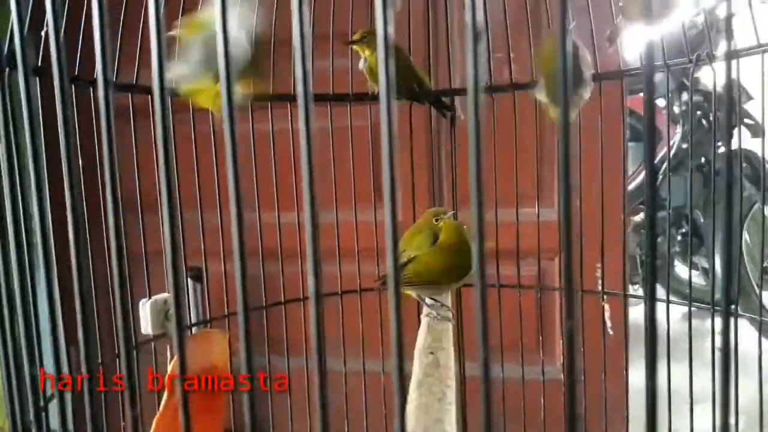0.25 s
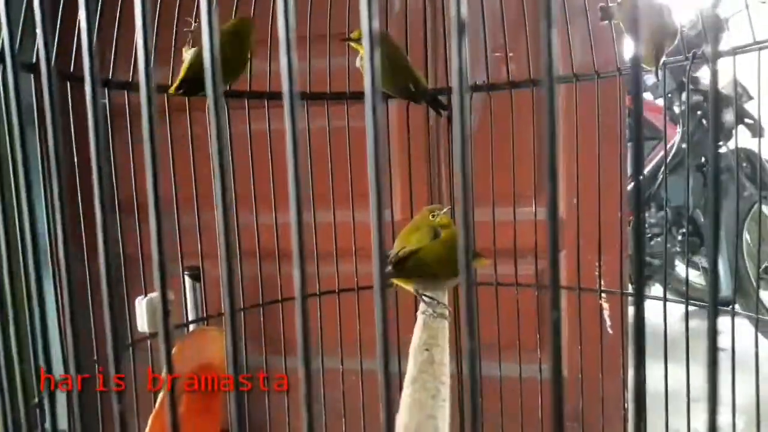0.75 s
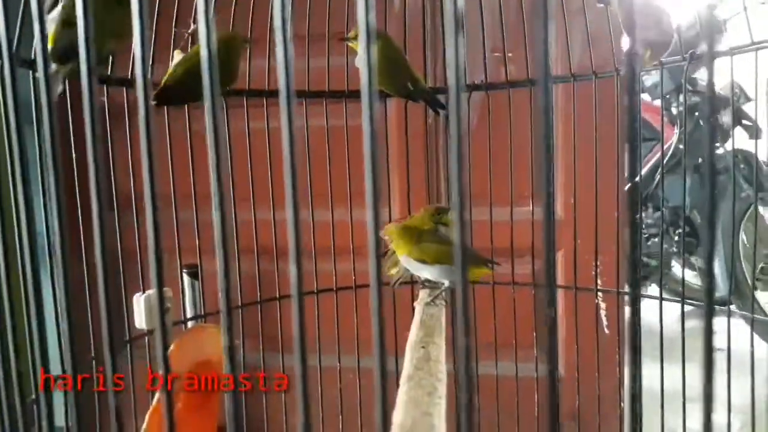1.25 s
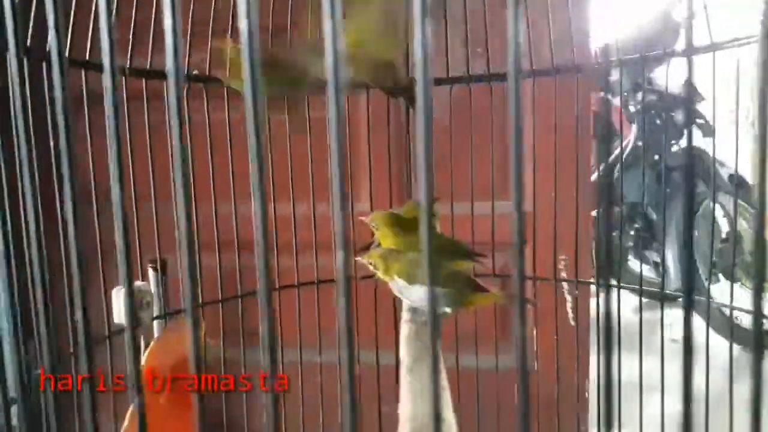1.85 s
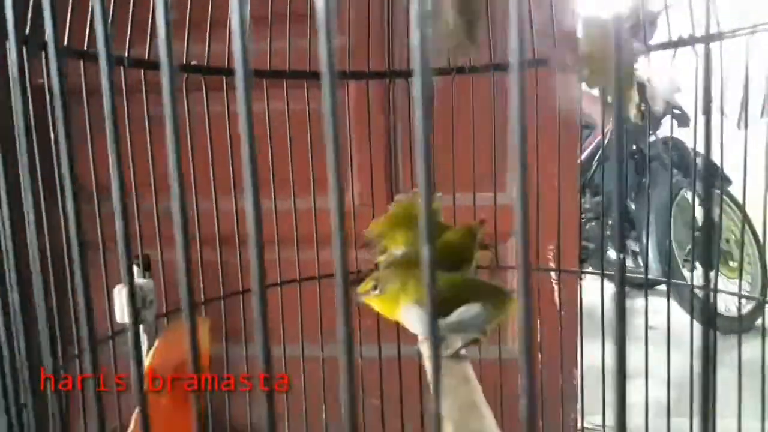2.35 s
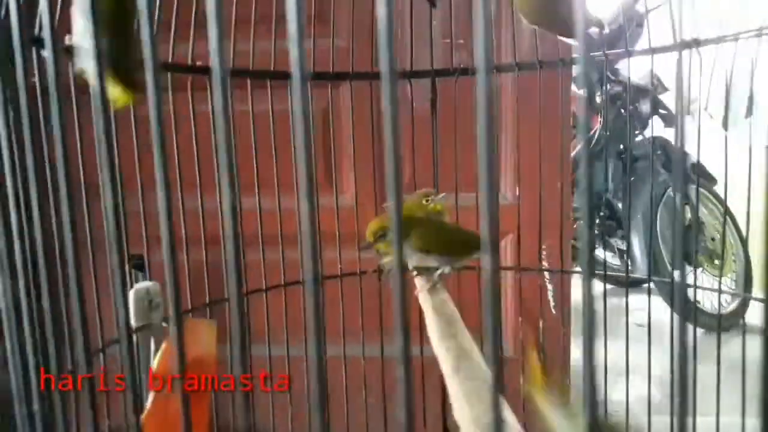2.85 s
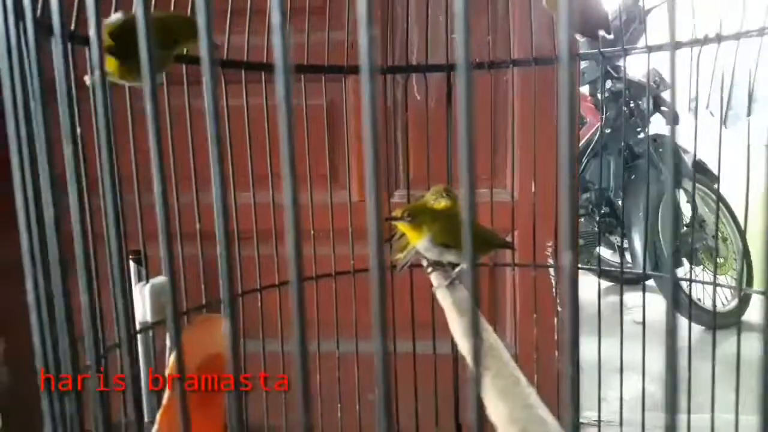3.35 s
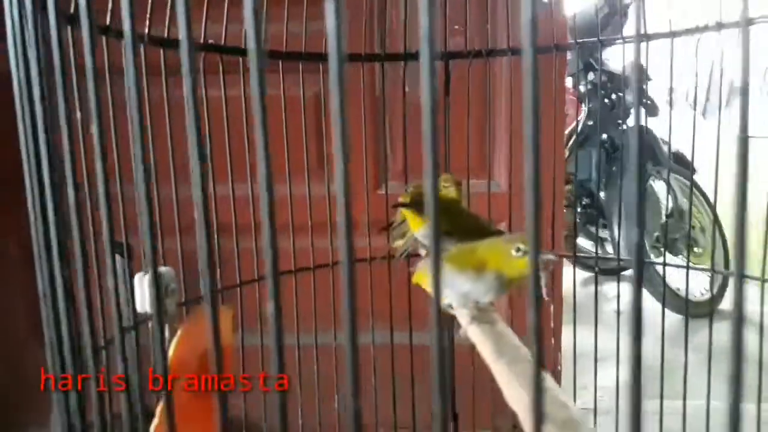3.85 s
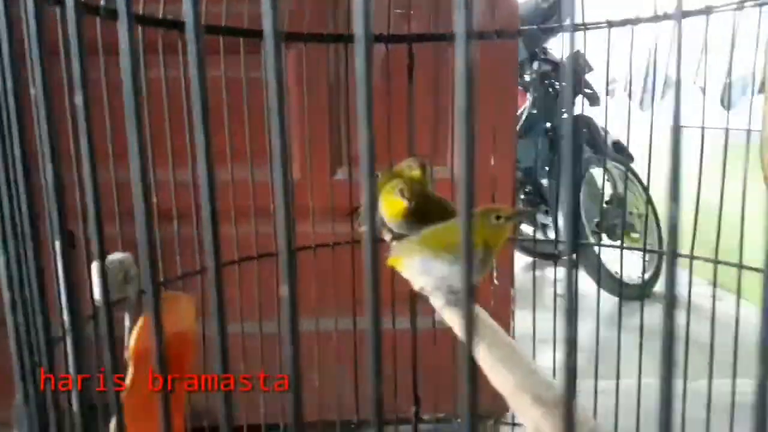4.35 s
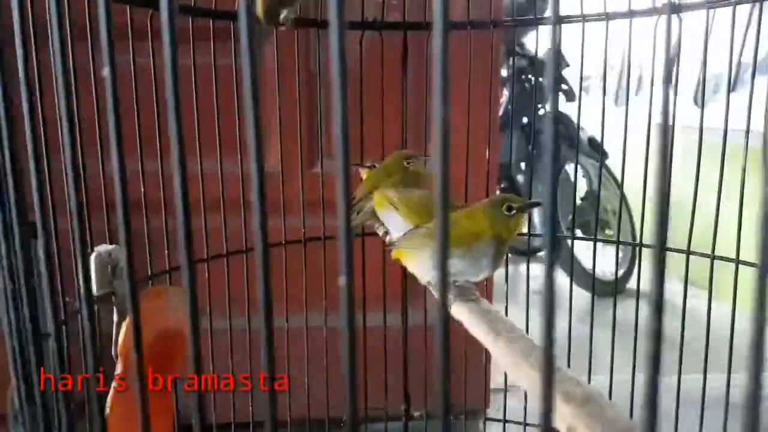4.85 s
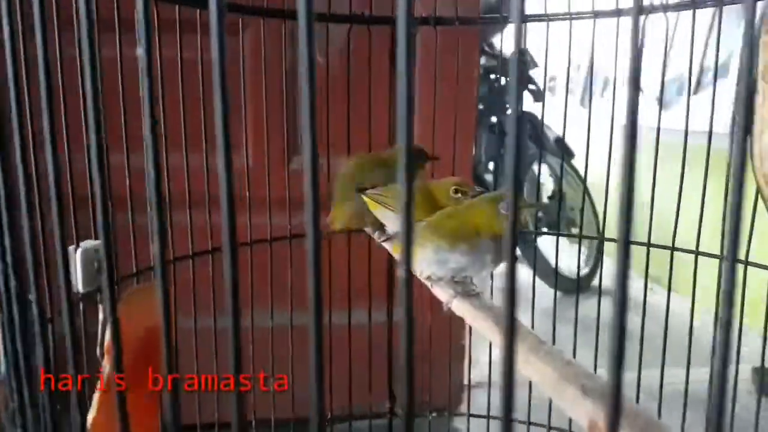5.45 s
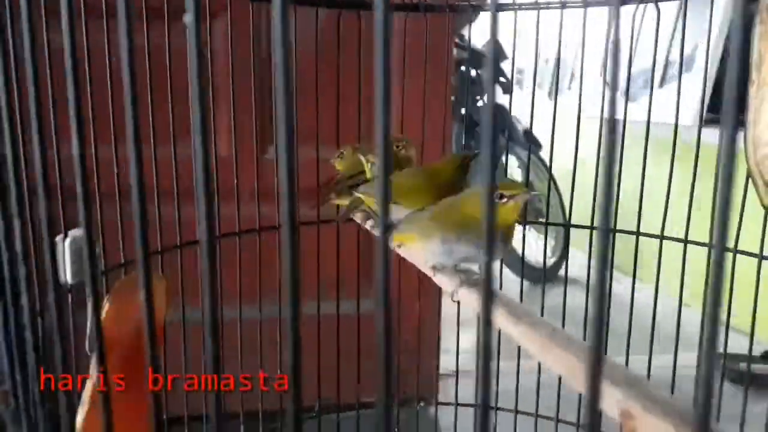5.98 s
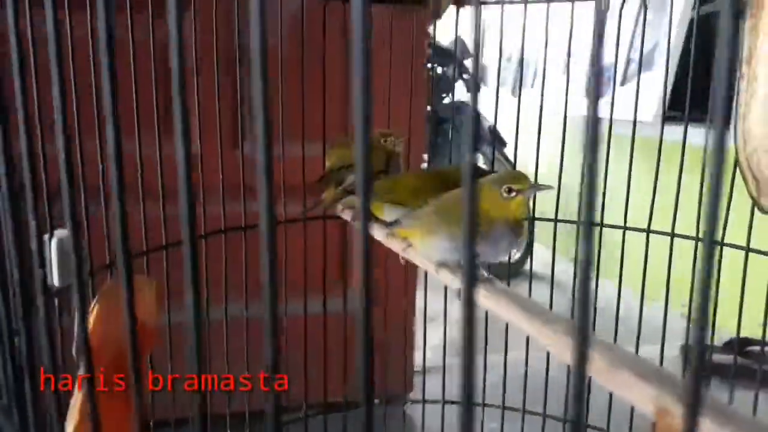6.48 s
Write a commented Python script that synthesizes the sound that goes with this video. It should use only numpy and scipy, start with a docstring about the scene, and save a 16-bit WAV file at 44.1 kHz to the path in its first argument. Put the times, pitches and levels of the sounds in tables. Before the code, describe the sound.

Small songbirds chirp very close in a wire cage on a porch, a fast run of high falling whistles, each starting with a quick trill. One bird adds a few harsh scolds. Wings flutter briefly, feet scrape perches and wires ping thinly. Past the middle the near chirps pause, leaving echoing answers on the right, then they resume. A soft yard murmur and a fading far engine lie behind.

```python
"""A porch, where small songbirds chirp in a wire cage, so near that the loudest overload the microphone.
Each chirp is a falling whistle that opens with a fast trill; one bird scolds in a period-doubled voice.
Wings push air and rustle, feet scrape perches, touched wires ping. More birds answer from the right,
mostly as echo. Behind them the yard murmurs, a far engine fades and lower bird voices pip and quaver."""
import sys
import numpy as np
from scipy import signal
from scipy.fft import rfft, irfft, next_fast_len
from scipy.io import wavfile
from scipy.ndimage import map_coordinates

SR = 44100
rng = np.random.default_rng(int(sys.argv[2]) if len(sys.argv) > 2 else 0)


def bounce(signal):
    """Save signal as a 16-bit WAV file at the path given by the first command-line argument."""
    frames = np.transpose(np.atleast_2d(signal))
    limited = np.clip(frames, -1, 1)
    pcm = np.round(limited * 32767).astype(np.int16)
    wavfile.write(sys.argv[1], SR, pcm)


N = 296352


def amp(db):
    """Decibels to gain."""
    return 10 ** (np.asarray(db) / 20)


def unit(x):
    """Scale to rms 1."""
    return x / np.sqrt(np.mean(x ** 2) + 1e-20)


def along(points, hz):
    """Interpolate (Hz, value) points on a log axis."""
    knots_hz, values = np.transpose(points)
    return np.interp(np.log(hz + 1), np.log(knots_hz + 1), values)


def across(values, size):
    """Join evenly spaced values over size samples."""
    return np.interp(np.linspace(0, 1, size), np.linspace(0, 1, len(values)), values)


def wobble(rate_hz, size):
    """Smooth random curve, rate_hz knots a second."""
    knots = rng.standard_normal(int(size * rate_hz / SR) + 4)
    return map_coordinates(knots, [np.arange(size) * rate_hz / SR])


def phase_of(hz):
    """Running phase in radians."""
    return 2 * np.pi * np.cumsum(hz) / SR


def filtered(x, response):
    """Apply a gain given as a function of Hz."""
    size = x.shape[-1]
    padded = next_fast_len(size + 8192)
    return irfft(rfft(x, padded) * response(np.fft.rfftfreq(padded, 1 / SR)), padded)[..., :size]


def noise(spectrum):
    """Noise of rms 1, shaped by (Hz, dB) points."""
    return unit(filtered(rng.standard_normal(N), lambda hz: amp(along(spectrum, hz))))


def add(track, start_s, sound):
    """Mix a sound into a track."""
    part = track[..., max(0, round(start_s * SR)):][..., :sound.shape[-1]]
    part += sound[..., :part.shape[-1]]


# Door, floor and roof echoes. Each row: delay in seconds, gain in dB.
WALL_ECHOES = [(.0019, -25), (.0043, -14.5), (.0078, -13), (.0128, -16.5), (.021, -18), (0.032, -17)]

def walls(x):
    """Near echoes beat against the gliding pitch."""
    return x + sum(amp(db) * np.pad(x, (int(delay_s * SR), 0))[:N] for delay_s, db in WALL_ECHOES)


# Porch decay. Each row: frequency in Hz, T60 in seconds.
PORCH_T60 = [(500, 0.86), (4000, 0.42), (9000, 0.5), (15000, 0.048)]

def porch(x):
    """Diffuse stereo echo of a mono sound; treble dies first."""
    hz, t, spectra = signal.stft(rng.standard_normal((2, SR * 3 // 4)), SR, nperseg=256)
    t60_s = along(PORCH_T60, hz)[:, None]
    tail = signal.istft(spectra * amp(-60 * t / t60_s), SR, nperseg=256)[1]
    tail /= np.linalg.norm(tail, axis=1, keepdims=True)
    return signal.fftconvolve(x[None], np.pad(tail, ((0, 0), (200, 0))), axes=1)[:, :N]


# Swell, hold and release: levels in dB, evenly spaced over a note.
NOTE_ARCH_DB = [-4.5, 1, 4.5, 4, 2.5, 2, 0.7, -3.5]
# How loud each pitch of the whistle sounds at the microphone. Each row: pitch in Hz, gain in dB.
PITCH_GAIN = [(3300, -4), (3700, 3), (4000, -1.3), (4300, -0.2), (4700, 0.4), (5100, 7), (5500, 0.5),
              (6000, -2)]

def contour(length_s, rise_s, top_hz, end_hz, knee, db, fade_db, count=25):
    """Pitch and level of a note: it scoops up, lingers, falls past the knee and flattens out."""
    t = np.linspace(0, length_s, count)
    progress = np.maximum(t - rise_s, 0) / (length_s - rise_s)
    height = (1 - progress ** 2) / (1 + (progress / knee) ** 2)
    scoop_hz = 12000 * np.maximum(rise_s - t, 0)
    droop_hz = 85 * progress ** 10
    kinks_hz = 28 * rng.standard_normal(count)
    hz = end_hz + (top_hz - end_hz) * height - scoop_hz - droop_hz + kinks_hz
    shake_db = 1.9 * rng.standard_normal(count)
    shape_db = across(NOTE_ARCH_DB, count) + along(PITCH_GAIN, hz) - fade_db * t / length_s + shake_db
    return hz, db + 20 * np.log10(unit(amp(shape_db)))


# Overtone colour. Each row: frequency in Hz, gain in dB.
BEAK_GAIN = [(4500, 0), (6200, -2.5), (7200, 5.5), (8000, 0.5), (8700, 11), (9300, 9), (10200, 4.5),
             (11000, -1.5), (12000, 2.5), (13400, 7), (15500, -3)]

def syrinx(length_s, pitches_hz, levels_db, depth_hz, overtones, trill_hz, trill_s, rough_hz, rasp=0):
    """One note: the pitch hooks up, trills, follows its glide and drops as the air stops."""
    size = int(length_s * SR)
    t = np.arange(size) / SR
    trill = np.sin(phase_of(trill_hz * (1 + 0.12 * wobble(36.3, size))))
    opening = np.exp(-(t / trill_s) ** 2)
    hooks = 1 - 0.26 * np.exp(-t / 0.0022) - 0.082 * np.exp((t - length_s) / 0.0033)
    waver_hz = 50 * wobble(110, size) + rough_hz * wobble(600, size)
    hz = across(pitches_hz, size) * hooks + depth_hz * (0.79 * opening + 0.085) * trill + waver_hz
    phase = phase_of(hz)
    level_db = across(levels_db, size)
    gate = lambda rise_s: np.clip(t / rise_s, 0, 1) * np.clip((length_s - t) / 0.0049, 0, 1)
    tone = amp(level_db) * gate(0.005) * np.sin(phase)
    # Overtones spit out as the membranes snap into motion, then fade less than the whistle.
    upper_db = (level_db + np.mean(levels_db)) / 2 + 4 * (opening - 1) + 7 * np.exp(-t / 0.006)
    for multiple, db in overtones:
        flicker_db = 3.5 * wobble(110, size)
        gain = amp(upper_db + db + along(BEAK_GAIN, multiple * hz) + flicker_db)
        jitter_rad = rasp * (0.55 * opening + 0.3) * wobble(1500, size)
        tone += gain * gate(0.003) * np.sin(multiple * phase + jitter_rad)
    tremolo_db = across([1.8, 0], size) * opening * trill
    return np.sqrt(2) * tone * amp(tremolo_db)


# Near whistles. Each row: start, length and rise in seconds, top and end pitch in Hz,
# knee as a share of the fall, relative level in dB, fade in dB, trill depth in Hz.
CHIRP_NOTES = [(0, .115, 0, 5210, 3390, 0.51, -5.5, 7.5, 217),
               (.171, .14, 0, 5824, 3654, 0.51, -6, 4.5, 300),
               (0.56, .077, 0.00047, 4490, 3530, 0.93, -11, -0.5, 120),
               (.751, 0.09, 0.0035, 4110, 3530, 1.18, -10, 0.5, 120),
               (0.891, 0.14, 0.022, 5002, 3562, 0.52, -4, 5, 268),
               (1.095, 0.14, 0.00038, 5354, 3715, .48, -5.5, 1, 250),
               (1.295, 0.077, 0.015, 5520, 4760, 1.12, -4, -7, 230),
               (1.405, 0.071, 0.0022, 4430, 3570, .84, -9.5, -1, 120),
               (1.757, 0.13, 0.026, 5270, 4140, 0.49, -5.5, -1.5, 146),
               (1.868, 0.11, 0.02, 4450, 3590, 0.96, -10, -4.5, 120),
               (2.087, 0.092, 0.011, 5700, 4190, 0.44, -5, 1.5, 252),
               (2.341, 0.095, 0, 4960, 3424, 0.55, -12.5, 1.5, 120),
               (2.55, .18, 0.021, 5436, 3680, 0.4, -6.5, 5, 300),
               (2.818, .11, 0.0019, 4950, 3574, 0.67, -8.5, 6.5, 199),
               (3.05, 0.089, 0.0011, 4646, 3465, 0.62, -13.5, 17, 120),
               (3.171, 0.072, 0.0043, 4370, 3340, 0.53, -16.5, 8, 120),
               (3.307, .15, .035, 5415, 4210, .32, -5.5, 7.5, 191),
               (3.505, 0.11, 0, 5140, 3324, 0.48, -8.5, 6.5, 248),
               (3.681, .145, 0.0023, 5763, 3698, 0.43, -7, -0.5, 333),
               (5.411, 0.16, 0.0034, 5634, 3780, .33, -8, -1.5, 120),
               (5.622, .14, 0.027, 5234, 3610, 0.75, -4, 2, 115),
               (5.888, 0.079, 0, 4620, 3554, 0.51, -12, 3, 120),
               (6.074, 0.13, 0, 5220, 4580, 0.2, -5.5, -4, 418),
               (6.185, .11, 0, 4080, 3696, 0.93, -9, 5, 100),
               (6.359, 0.083, 0.016, 5575, 4194, 0.49, -4, 1, 260),
               (6.609, .079, 0.0026, 4380, 3565, 0.93, -13, -0.5, 120)]
# Brief arched notes. Each row: start in seconds, relative level in dB.
TICK_NOTES = [(2.474, -16), (5.997, -16)]
# Whistle overtones. Each row: multiple of the pitch, gain in dB.
WHISTLE_OVERTONES = [(2, -42.5), (3, -69)]

def near_birds():
    """Loud clear whistles, close on the left."""
    song = np.zeros(N)
    for start_s, length_s, *shape, depth_hz in CHIRP_NOTES:
        add(song, start_s, syrinx(length_s, *contour(length_s, *shape), depth_hz, WHISTLE_OVERTONES,
                                  trill_hz=135, trill_s=0.048, rough_hz=42, rasp=0.7))
    for start_s, db in TICK_NOTES:
        add(song, start_s, syrinx(0.018, [3810, 3880, 3350], [db], 120, WHISTLE_OVERTONES,
                                  trill_hz=99, trill_s=0.061, rough_hz=18))
    song *= amp(-1.5)
    return walls(song) * amp([[0], [-34]]) + porch(song) * amp([[-14], [-31]])


# Short flights. Each row: start and length in seconds, relative puff and rustle levels in dB.
WING_FLIGHTS = [(0, 0.085, -44, -65), (0.429, 0.16, -41.5, -67), (1.797, 0.23, -74, -40),
                (2.541, 0.25, -63, -40), (3.517, 0.17, -69, -39.5), (4.435, 0.21, -63, -39),
                (5.482, 0.18, -66, -40), (5.672, 0.14, -45, -46)]

def wings(beat_hz=24):
    """Each wing beat pushes a puff of air and rustles the feathers."""
    air, feathers = np.zeros(N), np.zeros(N)
    for start_s, length_s, puff_db, rustle_db in WING_FLIGHTS:
        size = int(length_s * SR)
        phase = phase_of(beat_hz * (1 + 0.11 * wobble(8, size)))
        beats = np.sin(phase / 2) ** 4 * signal.windows.tukey(size)
        add(air, start_s, amp(puff_db) * beats)
        add(feathers, start_s, amp(rustle_db) * beats)
    puffs = air * noise([(20, 3), (60, 16), (130, 3), (400, -21), (2000, -79)])
    rustle = feathers * noise([(100, -39), (500, -16), (1800, 14), (6000, -11.5), (15000, -9)])
    return puffs * amp([[1], [7]]) + rustle


def shuffling():
    """Feet and feathers brush the perches in short uneven scrapes."""
    friction = noise([(400, -38), (1100, -15), (1700, -2), (2300, -8.5), (3200, -21), (9000, -42)])
    bursts = unit(amp(5 * wobble(28, N) + 2 * wobble(4, N)))
    scrapes = amp(-48) * friction * bursts
    return scrapes + amp(-6) * porch(scrapes)


# Murmur spectrum. Each row: frequency in Hz, relative density in dB.
YARD_SPECTRUM = [(15, -37), (25, -16.5), (183, -1), (340, -4.5), (631, -9.5), (1170, -6.5), (1620, -15),
                 (2060, -9.5), (2920, -11.5), (3720, -2.5), (4500, -1), (5140, -6), (5880, -17.5),
                 (13200, -31), (15500, -34)]
# Stereo likeness. Each row: frequency in Hz, left-right correlation.
YARD_CORRELATION = [(60, 0.059), (150, 0.6), (380, 0.57), (950, 0.87), (2380, 1), (5980, 0.02), (15000, 1)]
# Stereo balance. Each row: frequency in Hz, left minus right in dB.
YARD_BALANCE = [(30, -27), (70, -12.5), (150, -2), (600, -3), (1400, 0), (4000, -3.5), (12000, 0.5)]
# Level of the 150-1200 Hz band. Each row: time in seconds, level in dB.
YARD_BODY_DB = [(0, -41), (.5, -46), (1.5, -44), (3, -44), (4.5, -44.5), (5.6, -43.5), (6.72, -43)]

def yard():
    """Steady outdoor murmur, stronger on the right in the bass."""
    def mid_side_gain(hz):
        angle = np.arccos(np.clip(along(YARD_CORRELATION, hz), 0, 1)) / 2
        return amp(along(YARD_SPECTRUM, hz)) * [np.cos(angle), np.sin(angle)]
    mid, side = filtered(rng.standard_normal((2, N)), mid_side_gain)
    pair = np.array([mid + side, mid - side])
    pair = filtered(pair, lambda hz: amp(along(YARD_BALANCE, hz) * np.array([[0.5], [-0.5]])))
    body = filtered(pair.mean(0), lambda hz: (hz > 150) & (hz < 1200))
    level_db = np.interp(np.arange(N) / SR, *np.transpose(YARD_BODY_DB))
    return pair / body.std() * amp(level_db + 0.45 * wobble(9, N))


# Engine hum. Each row: time in seconds, strongest partial in Hz, relative level in dB.
ENGINE_RUN = [(0, 125.4, -61), (.3, 121, -44), (.55, 109.9, -49), (.9, 110.7, -57.5), (1.6, 109.8, -50),
              (2.6, 112, -53), (3.199, 108, -60.5), (6.72, 108, -78)]

def engine():
    """A far engine hums, slows a little and fades."""
    times_s, hz, db = np.transpose(ENGINE_RUN)
    t = np.arange(N) / SR
    phase = phase_of(np.interp(t, times_s, hz) * (1 + 0.019 * wobble(8.2, N)))
    hum = sum(amp(partial_db + 1.8 * wobble(13, N)) * np.sin(multiple * phase)
              for multiple, partial_db in [(0.5, -6), (1, 1), (1.5, -2)])
    return hum * amp(np.interp(t, times_s, db)) * amp([[-2], [1]])


def neighbouring_birds(count=70):
    """Faint scattered peeps from other yards, blurred by echo."""
    peeps = np.zeros(N)
    for when, pitch, glide, span, strength in rng.random((count, 5)):
        size = int((0.02 + 0.074 * span) * SR)
        hz = 1100 * 2.3 ** pitch * across([1, 0.92 + 0.14 * glide], size)
        add(peeps, when * N / SR, amp(-50 + 12 * strength) * np.hanning(size) * np.sin(phase_of(hz)))
    return peeps + amp(-5) * porch(peeps)


# Harsh calls. Each row: start and length in seconds, top and end pitch in Hz,
# knee as a share of the fall, relative level in dB, fade in dB, trill depth in Hz.
SCOLD_NOTES = [(0.133, 0.18, 4700, 3500, 0.37, -12.5, 15, 447),
               (0.607, 0.098, 4330, 3140, 1.8, -14, 11, 382), (2.801, .157, 4590, 3364, .55, -14, 12, 445),
               (4.609, 0.19, 4630, 3493, 0.57, -13, -0.5, 457)]
# Scold overtones. Each row: multiple of the pitch, gain in dB.
SCOLD_OVERTONES = [(1.5, -18), (2, -30), (2.5, -49), (3, -30), (3.5, -43)]

def scolding_bird():
    """A harsh voice in the middle: period doubling puts lines halfway between the harmonics."""
    song = np.zeros(N)
    for start_s, length_s, *shape, depth_hz in SCOLD_NOTES:
        note = syrinx(length_s, *contour(length_s, 0, *shape), depth_hz, SCOLD_OVERTONES,
                      trill_hz=130, trill_s=0.039, rough_hz=19.4, rasp=1)
        add(song, start_s, amp(-2) * note)
    return song * amp([[0.5], [0]]) + amp(-15) * porch(song)


# Clear answers. Each row: start and length in seconds, end pitch in Hz, relative level in dB.
ANSWER_NOTES = [(.28, .11, 4200, -30), (.62, 0.07, 4800, -24.5), (.811, .23, 3370, -24),
                (1.058, 0.079, 4420, -25.5), (1.508, .16, 3480, -24), (1.822, 0.11, 3310, -27),
                (2.527, 0.082, 3690, -23.5), (3.169, 0.056, 4010, -22), (3.345, .11, 3615, -22),
                (3.492, 0.084, 3230, -23.5), (4.03, 0.23, 3650, -35), (4.268, 0.22, 3710, -25.5),
                (4.569, 0.07, 5050, -23.5), (4.847, 0.24, 3530, -29.5), (5.067, 0.044, 4030, -21.5),
                (5.251, 0.15, 3640, -27), (5.419, 0.12, 3690, -25.5), (5.74, 0.16, 3480, -26),
                (5.972, .11, 4840, -30), (6.23, 0.057, 3990, -24.5), (6.313, 0.1, 3940, -23.5),
                (6.555, 0.14, 3690, -24.5)]

def answering_birds(top_hz=5210, faint_count=14, faint_s=0.39, faint_end_hz=3810, faint_db=-39.5):
    """Chirps from further off on the right, clear or faint, arrive mostly as echo."""
    song = np.zeros(N)
    faint = [((k + when) * N / SR / faint_count, faint_s * (0.5 + span), faint_end_hz, faint_db)
             for k, (when, span) in enumerate(rng.random((faint_count, 2)))]
    for start_s, length_s, end_hz, db in ANSWER_NOTES + faint:
        slide_hz = end_hz + (top_hz - end_hz) * np.array([0.97, 0.72, 0.42, 0.2, 0])
        add(song, start_s, syrinx(length_s, slide_hz, [db - 2, db, db - 4], depth_hz=280, overtones=[],
                                  trill_hz=190, trill_s=0.11, rough_hz=74))
    return walls(song) * amp([[-24], [-9]]) + porch(song) * amp([[-14], [-2.5]])


def peep(length_s, start_hz, end_hz, db, edge_s=0.0095):
    """A plain soft-edged whistle."""
    size = int(length_s * SR)
    phase = phase_of(across([start_hz, end_hz], size) + 30 * wobble(199, size))
    return amp(db) * signal.windows.tukey(size, 2 * edge_s / length_s) * np.sin(phase)


# Steady pips. Each row: start and stop in seconds, first relative level in dB, loss per pip in dB.
PIP_SERIES = [(1.551, 1.9, -37, 2.5), (4.192, 5.05, -32, 2.5), (6.411, 6.65, -24.5, 11)]
# Quavering whistles. Each row: start and length in seconds, relative level in dB.
QUAVER_NOTES = [(1.724, 0.18, -47.5), (1.873, 0.088, -31.5), (1.993, 0.27, -36.5), (2.417, 0.067, -34.5),
                (3.2, .27, -39)]
# Single calls. Each row: start and length in seconds, start and end pitch in Hz, relative level in dB.
SOFT_CALLS = [(.966, .045, 2396, 2170, -36), (1.929, 0.044, 1464, 1455, -35.5),
              (4.125, 0.033, 1593, 1690, -34), (5.03, 0.04, 1660, 1557, -33.5),
              (5.546, .055, 755, 780, -40), (5.71, 0.055, 766, 773, -43), (6.291, .12, 2920, 2950, -39.5),
              (6.39, .09, 628, 520, -41)]

def yard_birds(pip_hz=2390, pip_s=0.029, pip_period_s=0.155, quaver_hz=2612):
    """Lower voices across the yard: runs of pips, a quavering whistle and single calls."""
    song = np.zeros(N)
    for first_s, stop_s, db, loss_db in PIP_SERIES:
        for k, start_s in enumerate(np.arange(first_s, stop_s, pip_period_s)):
            add(song, start_s, peep(pip_s, pip_hz - 20, pip_hz + 20, db - k * loss_db))
    for start_s, length_s, db in QUAVER_NOTES:
        note = peep(length_s, quaver_hz, quaver_hz, db)
        flutter_db = 8 * wobble(45.8, len(note))
        add(song, start_s, note * unit(amp(flutter_db)))
    for start_s, *call in SOFT_CALLS:
        add(song, start_s, peep(*call))
    return song * amp(4) + amp(-3.5) * porch(song)


# Thin metallic pings. Each row: start in seconds, pitch in Hz, level in dB, T60 in seconds.
WIRE_PINGS = [(2.334, 10630, -31, 0.46), (4.1, 13100, -48, 0.34), (4.89, 13000, -49, .3),
              (5.49, 11020, -40, 0.58), (6.32, 13250, -46, 0.29)]

def wires():
    """Lightly touched cage wires ring very high."""
    ring, t = np.zeros(N), np.arange(SR // 2) / SR
    for start_s, hz, db, t60_s in WIRE_PINGS:
        envelope = amp(db - 60 * t / t60_s) * (1 - np.exp(-t / 0.0028))
        add(ring, start_s, envelope * np.sin(2 * np.pi * hz * t + 0.5 * wobble(150, len(t))))
    return ring + amp(-18) * porch(ring)


def scene():
    """Birds, cage and yard in stereo."""
    birds = near_birds() + scolding_bird() + answering_birds() + yard_birds() + neighbouring_birds()
    cage = wires() + wings() + shuffling()
    return birds + cage + engine() + yard()


def record(dry):
    """The loudest whistles clip; treble above the band limit is cut."""
    ceiling, limit_hz = 1.02, 15800
    clipped = dry / (1 + np.abs(dry / ceiling) ** 12) ** (1 / 12)
    return filtered(clipped, lambda hz: hz < limit_hz)


dry = scene()
out = record(dry)
bounce(out)
```